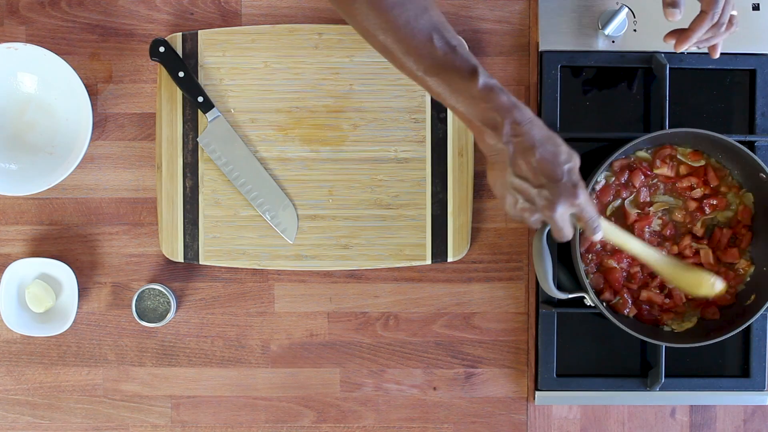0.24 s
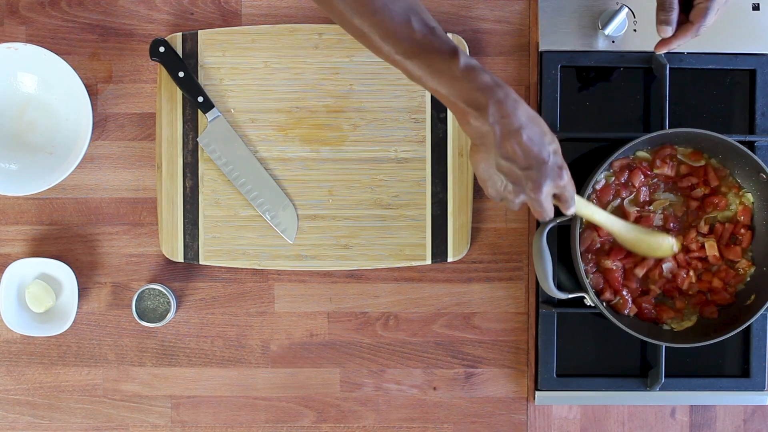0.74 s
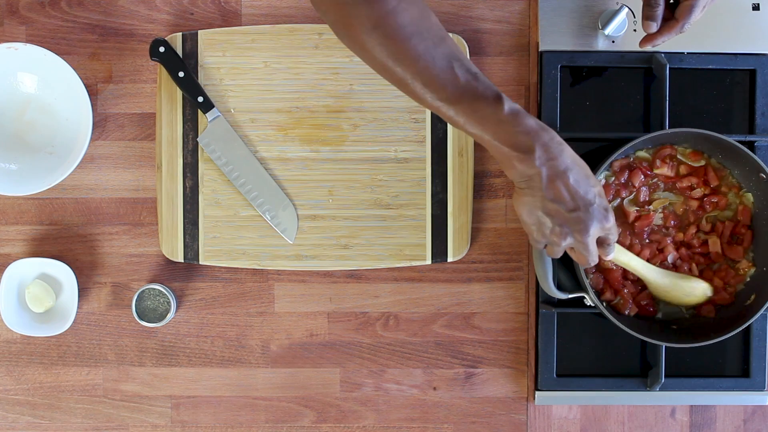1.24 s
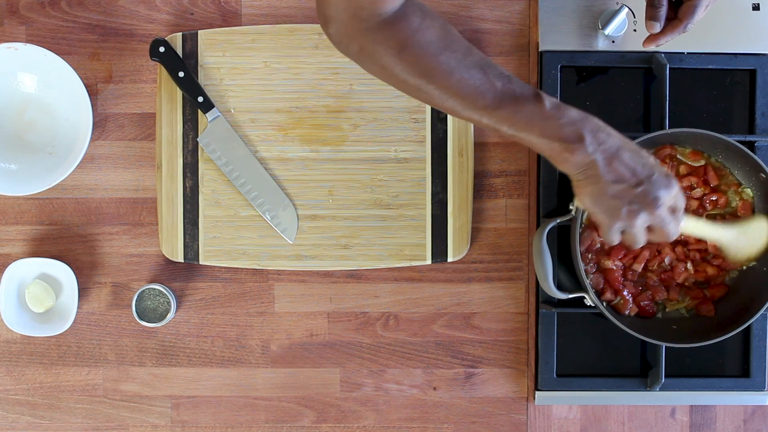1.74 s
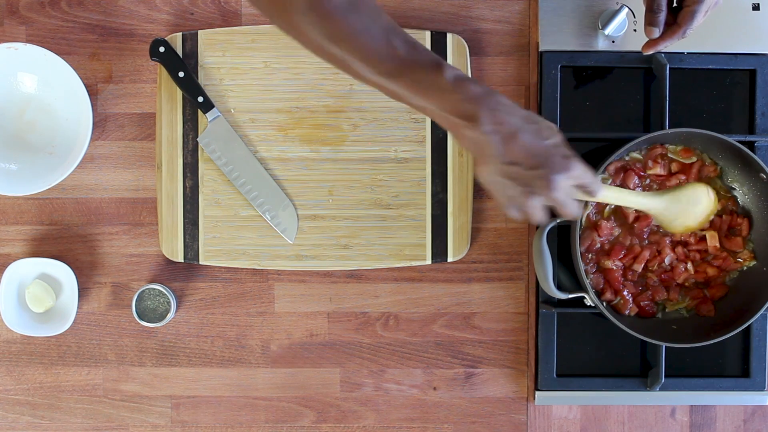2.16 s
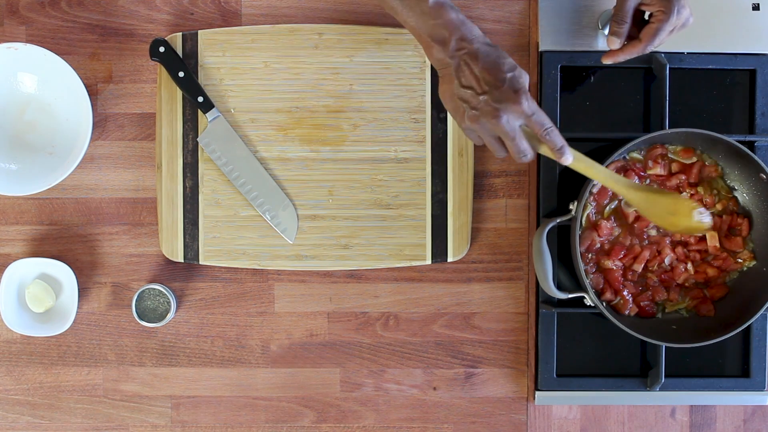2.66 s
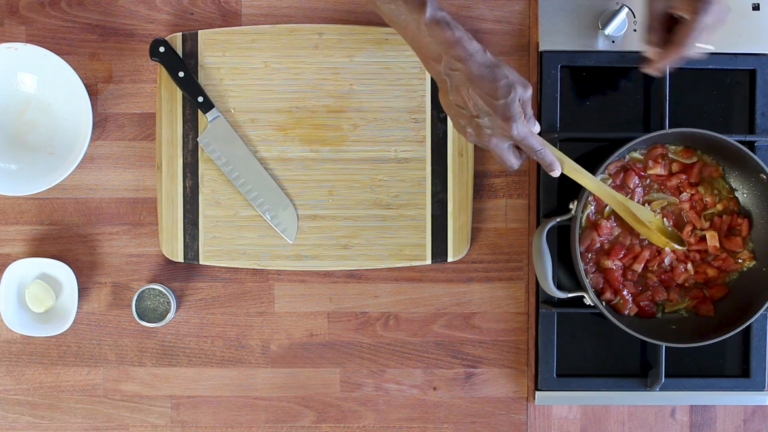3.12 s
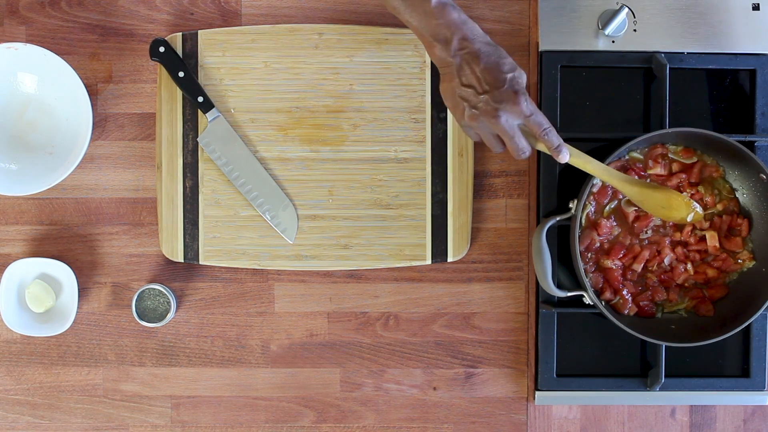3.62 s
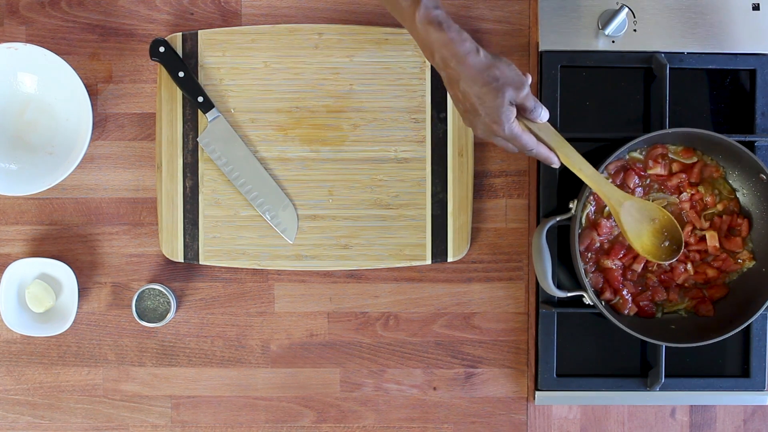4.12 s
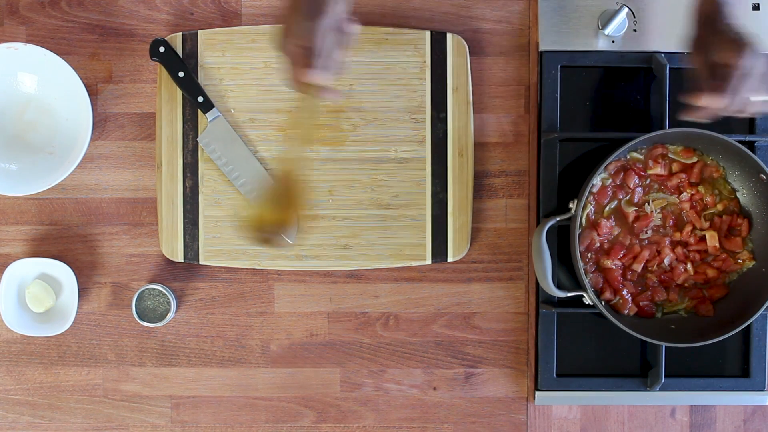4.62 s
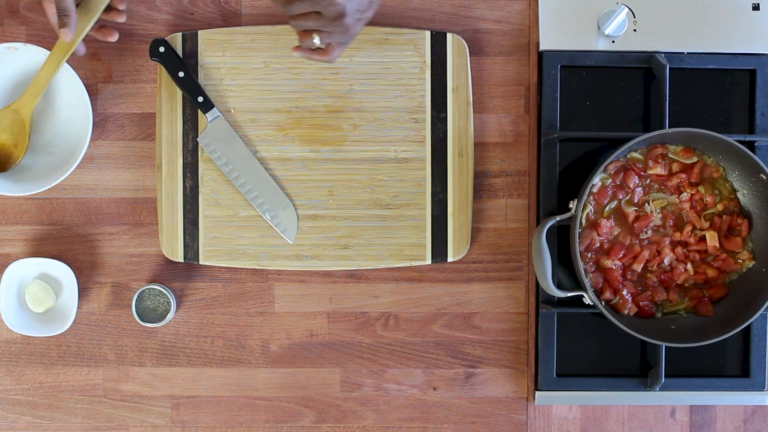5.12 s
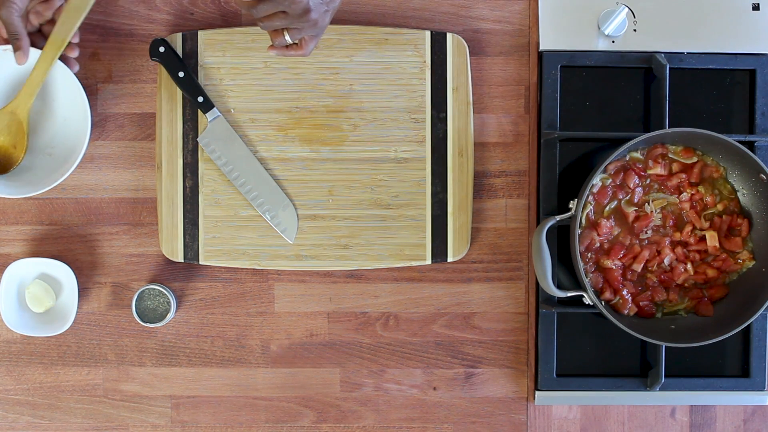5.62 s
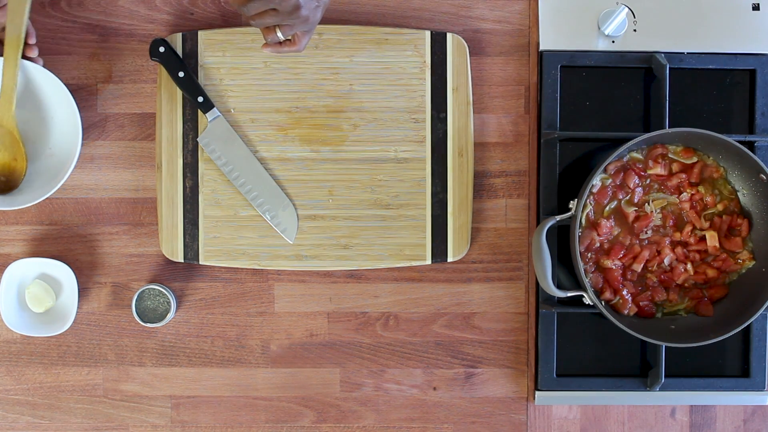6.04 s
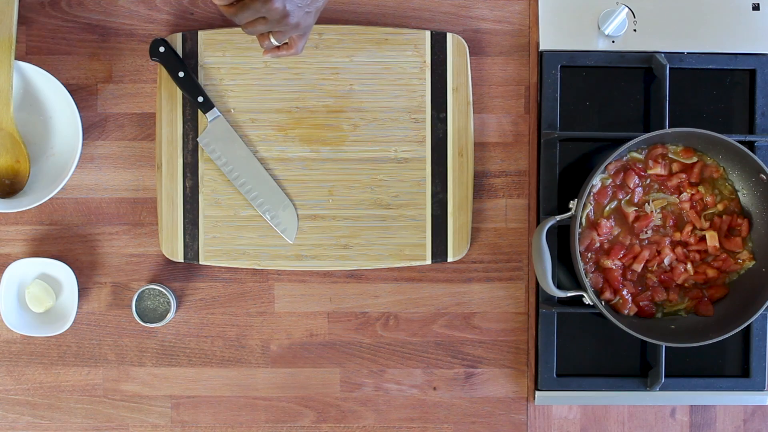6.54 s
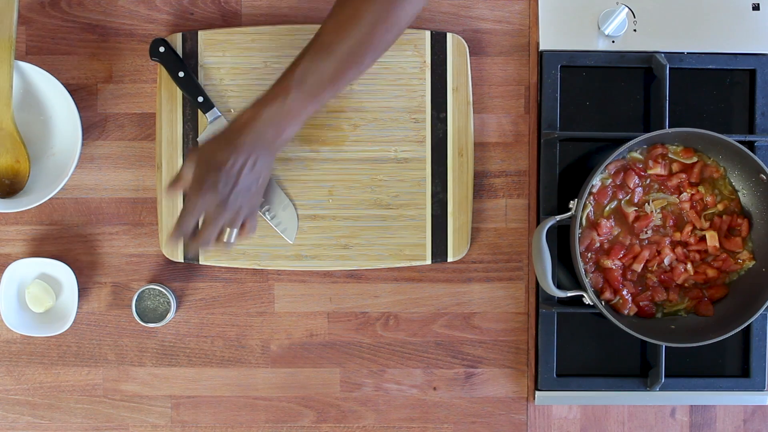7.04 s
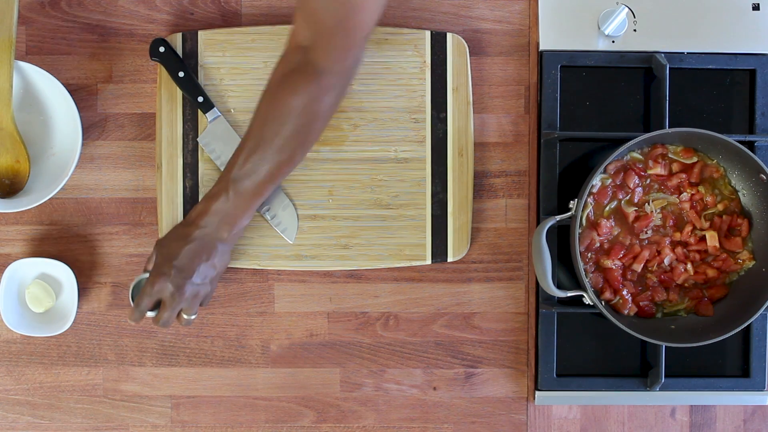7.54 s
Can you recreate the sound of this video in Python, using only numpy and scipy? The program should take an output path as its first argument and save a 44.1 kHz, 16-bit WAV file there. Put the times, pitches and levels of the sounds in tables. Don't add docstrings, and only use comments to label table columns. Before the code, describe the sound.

Faint tomato sizzle with small spits, dull wooden bumps, three hard spoon raps on the pan rim, then a light clack into a bowl.

```python
import sys
import numpy as np
from scipy import signal
from scipy.fft import rfft, irfft
from scipy.io import wavfile
from scipy.ndimage import uniform_filter1d

SR = 44100
rng = np.random.default_rng(int(sys.argv[2]) if len(sys.argv) > 2 else 0)


def how_loud(loudness_db):
    steps = np.asarray(loudness_db, float) / 20
    return 10 ** steps


def output_pcm(signal):
    pcm = np.clip(np.atleast_2d(signal).T, -1, 1) * 32767
    wavfile.write(sys.argv[1], SR, np.round(pcm).astype(np.int16))


N = 342774
T = np.arange(SR) / SR
HALF = SR // 2

# t/s, level/dB
BOIL = [(0, 2.5), (.8, 1.5), (1.05, -1), (1.45, 2), (1.75, 0.5), (2.15, 4), (2.5, 0.5), (3.3, -.5),
        (4.0, 0), (4.7, 0), (5.5, -2.5), (6.1, -1.5), (6.5, -2.5), (7.0, -1.5), (7.3, -8.5), (7.77, -5.5)]
# f/Hz, level/dB
HISS = [(1290, -13), (2200, -9), (2470, -28), (2700, -4), (3330, -5), (5600, -5), (7280, -30),
        (12300, -120)]
SPRAY = [(3300, -10.5), (5600, -5), (7350, -5), (9650, -6), (11500, -9.5), (13000, -14), (14500, -24),
         (15700, -43)]
MURMUR = [(240, -15), (400, -4), (560, -2.5), (800, -4.5), (1020, -9), (1400, -4), (2000, -8.5),
          (2500, -6.5), (3900, -23.5)]
RUMBLE = [(12, -27), (20, 9), (43, -10.5), (70, -1), (114, -1), (151, -0.5), (295, -3), (354, 2),
          (414, -24), (600, -1.5), (780, -33), (1320, -120)]
# f/Hz, width/Hz, level/dB
PAN_RESONANCES = [(726, 130, 4), (1212, 245, 8), (1782, 134, 6.5), (2336, 100, 3), (3350, 55, 8),
                  (3875, 49, 4.5), (4390, 40, 5.5), (5200, 840, -3), (7000, 2100, 1)]
# t/s, peak level/dB, centre f/Hz
SPITS = [(0.119, -40, 7350), (0.412, -37.5, 9970), (0.5476, -57, 2420), (0.575, -42, 9520),
         (0.7103, -40, 9700), (0.78, -43, 2350), (0.8244, -39, 8900), (0.949, -45, 9430),
         (1.0985, -41, 2860), (1.2144, -45, 6090), (1.2418, -38, 7900), (1.3463, -38, 2750),
         (1.3672, -46, 4390), (1.932, -47, 3120), (2.0395, -45, 2280), (2.2287, -45, 6550),
         (2.4192, -41, 8200), (2.578, -42, 6360), (3.5138, -48, 2320), (3.918, -47, 5140),
         (4.37, -50, 8040), (5.404, -43, 3240), (6.2176, -42, 3350)]
# t/s, length/s, peak level/dB, centre f/Hz
SHUFFLES = [(.42, 0.1, -66, 153), (1.252, 0.13, -64.5, 72), (1.791, 0.024, -60, 94),
            (4.25, 0.097, -58, 138), (4.85, 0.15, -61.5, 172), (5.4, 0.13, -61, 113),
            (5.779, 0.15, -60.5, 350), (5.95, 0.23, -62.5, 172), (6.296, 0.026, -68, 70),
            (7.298, 0.088, -60.5, 245), (7.65, 0.14, -67.5, 150)]
# t/s, wood peak level/dB, thump level/dB, click level/dB, pitch ratio
BUMPS = [(1.51, -35, -4.5, -12, 0.9), (1.773, -53, -1, -26, 1.03), (1.82, -55, -19, -25, 1.9),
         (1.843, -36, -7.5, -13, 0.82), (1.854, -31, -13.5, -15, 1.003), (1.864, -33.5, -10, -31, 1.05),
         (2.67, -23, -30, -26, 1.08), (2.719, -37, -25, -28, 1.02), (3.061, -43.5, -2, -35, 1.2),
         (4.202, -36.5, -10.5, -35, 1), (6.072, -48, -25, -22, 1.26)]
KNOCKS = [
    (2.618, -9, -13.5, -6, 1.001),
    (2.813, -9, -10.5, -3.5, 0.98),
]
LAST_KNOCK = [
    (3.6333, -6.5, -11, -3, 1.001),
]
LAYING = [
    (5.012, -19.5, -6, -4.5, 1.054),
    (5.035, -31, -8, -23, 0.9),
    (5.049, -28.5, -3.5, -18, 0.912),
    (5.067, -34.5, -2.5, -31.5, 0.86),
    (5.099, -29.5, -5.5, -22, 0.85),
    (5.124, -34, -9, -27, 0.91),
    (5.155, -44, 3.5, -30, 0.89),
    (5.205, -45, -1.5, -30, 0.99),
]
# f/Hz, level/dB, T60/s
PAN_FLOOR = ([(1130, 12, 0.027), (944, -0.5, 0.076), (1640, 0.5, 0.027)], [(644, 8.5, 0.024),
             (457, -10.5, 0.22), (235, -43, 0.031)], [(2070, 9.1, 0.025), (2610, 6, 0.032),
             (3600, 4, 0.018)])
RIM = ([(1228, 3.5, 0.038), (1763, -2.5, 0.048), (1422, -11, 0.1)], [(475, 3, 0.02), (311, -22, 0.02),
       (646, -9, 0.034)], [(2636, 0.5, 0.026), (3120, -8, 0.033), (4560, -19, 0.062)])
HANDLE = ([(1230, 0, 0.053), (1735, 6.5, 0.034), (1465, -5, 0.03)], [(534, -2, 0.038), (311, -17, 0.02),
          (664, -5, .03)], [(2660, 2, 0.024), (3250, -6, 0.022), (4250, -14, 0.015)])
BOWL = ([(1480, 9.5, 0.013), (1180, 2.5, 0.012), (852, -8, 0.11)], [(537, 7.5, 0.011), (363, -1.5, 0.063),
        (217, -2.5, 0.048)], [(4550, -2, 0.019), (3630, 3, 0.019), (5750, -23, 0.015)])
# t/s, f/Hz, peak level/dB, rise/s, T60/s
PAN_RINGS = [(1.508, 1070, -41, 0.004, 0.65), (2.67, 1180, -15.5, .002, .05), (2.831, 432, -37, .03, .5),
             (3.061, 1015, -31, 0.0033, 0.041), (3.644, 7550, -24, .003, .05),
             (3.6575, 7430, -23.5, .001, .04), (4.2015, 1156, -24, .0015, .022),
             (6.073, 1400, -40, .0015, .02), (6.217, 1870, -40, .001, .015)]
BOWL_RINGS = [(5.011, 7600, -35.5, .002, .18), (5.0115, 1470, -20, .0008, 0.02),
              (5.011, 3740, -46, .0018, 0.49), (5.011, 9787, -49.5, .002, 0.18),
              (5.009, 2540, -45, .003, .25), (5.011, 10800, -51, .001, .08), (5.011, 2180, -49, .004, 0.29),
              (5.021, 5570, -38.5, 0.013, 0.27), (5.03, 899, -35, .03, 0.65),
              (5.024, 2156, -32.5, 0.051, 0.53), (5.024, 2183, -36, 0.048, 0.43)]
# t/s, peak level/dB, centre f/Hz, relative width, T60/s
RATTLE = [(1.6878, -36, 1900, 2.2, 0.013), (2.6257, -15, 7000, 0.6, 0.044),
          (2.6434, -15.5, 8800, 0.15, 0.014), (2.6544, -24, 4320, 0.46, 0.032),
          (2.8201, -12, 6850, 0.38, 0.027), (2.8329, -19.5, 7500, 0.79, 0.025),
          (3.6345, -23, 4330, 0.27, 0.015), (3.6342, -24, 8000, .4, 0.018),
          (3.6408, -18.5, 8840, 0.35, 0.03), (3.6572, -23.5, 8700, 0.23, 0.046),
          (5.0115, -31, 4560, 0.33, 0.0089), (5.0903, -37.5, 5200, 0.14, 0.012),
          (5.0905, -34.5, 3200, 0.17, 0.017), (5.091, -43, 7000, 0.55, 0.006)]
# f/Hz, T60/s
ROOM_T60 = [(60, 1), (160, 0.37), (420, 0.45), (1100, 0.46), (2910, 0.36), (7680, 0.36)]
# f/Hz, level/dB
ROOM_COLOUR = [(30, -1), (70, -7.5), (150, 10), (210, 3), (350, 14.5), (550, 10.5), (750, 9.5), (900, 2),
               (1150, 4.5), (1750, 2.5), (2150, 6), (3200, 11.5), (4600, 6.5), (8000, 1), (16000, 1)]
# f/Hz, level/dB, T60/s
ROOM_MODES = [(69.9, -7, 0.49), (115, -8, 0.29), (179, -26.5, 1), (207.8, -3.5, 0.39), (248, 2.5, 0.097),
              (309.7, -5.5, 0.42), (489.3, -5, 0.15)]


def colour(x, points):
    hz, db = np.transpose(points)
    f = np.maximum(np.fft.rfftfreq(len(x), 1 / SR), 1)
    gain = how_loud(np.interp(np.log(f), np.log(hz), db))
    return irfft(rfft(x) * gain, len(x))


def unit(x):
    return x / np.sqrt(np.mean(x ** 2))


def fade(t60, size=HALF):
    return np.exp(-np.log(1000) * T[:size] / t60)


def add(track, s, x):
    i = int(s * SR)
    track[i:i + len(x)] += x[:N - i]


def walk(rate):
    k = int(SR / rate)
    steps = np.repeat(rng.standard_normal(N // k + 1), k)
    return unit(uniform_filter1d(uniform_filter1d(steps, k), k)[:N])


def burst(hz, width, t60, noise):
    edges = np.clip([hz / (1 + width), hz * (1 + width)], 100, 12500)
    band = signal.butter(3, edges, "bandpass", fs=SR, output="sos")
    x = signal.sosfilt(band, noise * fade(t60, size=len(noise)))
    return x / np.abs(x).max()


def bubbles(rate, flurry, size_db, hold):
    sizes = how_loud(size_db * rng.exponential(size=N).clip(0, 4))
    pops = (rng.random(N) < rate * flurry / SR) * sizes
    return unit(signal.lfilter([1], [1, -hold], pops) * rng.standard_normal(N))


def fizz(flurry):
    per_s, cycles, size_db = 19, 7.8, 5.5
    out = 0
    for hz in 2600 * 2 ** np.arange(0, 2.4, .3):
        sizes = how_loud(size_db * rng.exponential(size=N).clip(0, 3))
        pops = (rng.random(N) < per_s * flurry / SR) * sizes
        pole = np.exp(2j * np.pi * hz / SR - np.log(1000) * hz / (cycles * 2 * SR))
        out = out + unit(signal.lfilter([1], [1, -pole], pops).imag) * np.sqrt(hz)
    return unit(out)


def patchy(x):
    spectrum = rfft(x)
    f = np.maximum(np.fft.rfftfreq(N, 1 / SR), 1000)
    band = np.floor(3 * np.log2(f / 1000))
    return sum(irfft(spectrum * (band == k), N) * how_loud(0.7 * walk(7)) for k in np.unique(band))


def through_pan(x):
    f = np.fft.rfftfreq(N, 1 / SR)
    lift_db = sum(db / (1 + (2 * (f - hz) / width) ** 2) for hz, width, db in PAN_RESONANCES)
    return irfft(rfft(x) * how_loud(lift_db), N)


def sizzle():
    t = np.arange(N) / SR
    from_middle = t - t.mean()
    boil = np.interp(t, *np.transpose(BOIL))
    hiss_db = -59.5 + 0.69 * boil + 0.78 * from_middle
    spray_db = -55 + boil
    murmur_db = -56.5 + 0.15 * boil - 0.37 * from_middle
    noise = rng.standard_normal((4, N))
    swell, flurry = walk(14), how_loud(3.5 * walk(16))
    large = bubbles(120, flurry, 3.9, 0.995)
    small = bubbles(370, flurry, 5.8, 0.86)
    steam = noise[0] + 0.13 * large + 0.052 * small
    hiss = unit(colour(steam, HISS)) * how_loud(hiss_db + 0.21 * swell)
    bursting = noise[1] + 0.42 * large + 0.31 * small + how_loud(-11.5) * fizz(flurry)
    spray = unit(colour(bursting, SPRAY)) * how_loud(spray_db + 0.24 * swell)
    simmer = noise[2] + 0.22 * large
    murmur = unit(colour(simmer, MURMUR)) * how_loud(murmur_db + 0.5 + 0.72 * swell)
    rumble = unit(colour(noise[3], RUMBLE)) * how_loud(-62 - 1.0 + walk(13))
    return through_pan(patchy(hiss + spray) + murmur) * how_loud(-2.5) + rumble


def chatter(rows):
    out = np.zeros(N)
    for (s, db, hz, width, t60), noise in zip(rows, rng.standard_normal((len(rows), 2048))):
        add(out, s, how_loud(db) * burst(hz, width, t60, noise))
    return out


def shuffles():
    out = np.zeros(N)
    for (s, length, db, hz), noise in zip(SHUFFLES, rng.standard_normal((len(SHUFFLES), SR))):
        band = signal.butter(2, [hz / 1.37, hz * 1.3], "bandpass", fs=SR, output="sos")
        low = unit(signal.sosfilt(band, noise))
        swell = how_loud(db) * low * np.exp(-((T - .5) / length) ** 2)
        add(out, max(s - .5, 0), swell[int(max(.5 - s, 0) * SR):])
    return out


def walls():
    out = np.zeros(N)
    for s, hz, db, rise, t60 in PAN_RINGS + BOWL_RINGS:
        envelope = (1 - np.exp(-T / rise)) * fade(min(t60, 1), size=SR)
        add(out, s, how_loud(db) * np.sin(2 * np.pi * hz * T) * envelope)
    return out


def ring(modes, pitch, chance):
    return sum(how_loud(db + 3.5 * c) * np.sin(2 * np.pi * hz * pitch * T[:HALF]) * fade(t60)
               for (hz, db, t60), c in zip(modes, chance))


def strike(rows, body, knock_hz, push_db, room_db, rise_s):
    near, sent, t = np.zeros(N), np.zeros(N), T[:HALF]
    wood, thump, click = body
    contact = 1. * (t == 0)
    for (s, db, thump_db, click_db, pitch), c in zip(rows, rng.standard_normal((len(rows), HALF))):
        blow = ring(wood, pitch, c[:3])
        blow = blow + how_loud(thump_db + 9.5) * ring(thump, pitch, c[3:6])
        blow = blow + how_loud(click_db) * ring(click, pitch, c[6:9])
        blow = blow * (1 - np.exp(-t / rise_s))
        crack = how_loud(click_db + 2.5) * burst(3200, 1.0, 0.026, c)
        push = how_loud(push_db) * np.exp(-((t - .003) / 0.002) ** 2)
        knock = how_loud(11.5) * burst(knock_hz * pitch, 0.34, 1, contact)
        knock = knock + how_loud(thump_db + 14) * burst(396, 1.4, 1, contact)
        add(near, s, how_loud(db - 5.0) * (blow + how_loud(-6.5) * crack + how_loud(-6.5) * knock))
        add(sent, s, how_loud(db - 7.0 + room_db) * (how_loud(-7.5) * blow + knock + crack + push))
    return np.array([near, sent])


def spoon():
    inside = strike(BUMPS, PAN_FLOOR, knock_hz=947, push_db=-8.5, room_db=-2.5, rise_s=0.0015)
    rim = strike(KNOCKS, RIM, knock_hz=1378, push_db=-9, room_db=-0.1, rise_s=0.001)
    last = strike(LAST_KNOCK, HANDLE, knock_hz=1400, push_db=-8.0, room_db=-1.35, rise_s=0.0012)
    laid = strike(LAYING, BOWL, knock_hz=905, push_db=-32, room_db=-1.5, rise_s=0.001)
    return inside + rim + last + laid


def kitchen():
    hz, t60 = np.transpose(ROOM_T60)
    spectrum = rfft(colour(rng.standard_normal(SR), ROOM_COLOUR))
    f, tail = np.arange(HALF + 1), 0
    for centre in 30 * 2 ** np.arange(0, 9.6, .5):
        band = (f >= centre * 2 ** -.25) & (f < centre * 2 ** .25)
        decay = fade(np.interp(np.log(centre), np.log(hz), t60), size=SR)
        tail = tail + irfft(spectrum * band) * decay
    waves = sum(how_loud(db) * np.sin(2 * np.pi * m * T) * fade(d, size=SR) for m, db, d in ROOM_MODES)
    build = 1 - np.exp(-(T / .007) ** 2)
    return how_loud(-34.0) * build * (tail + how_loud(-5.5) * waves)


def scene():
    boiling = sizzle()
    spits = chatter([(*row, 0.21, 0.013) for row in SPITS])
    moves = shuffles()
    near, sent = spoon()
    tones, rattle = walls(), chatter(RATTLE)
    driven = sent + how_loud(-4.5) * rattle + how_loud(-10) * spits + how_loud(-37) * tones
    echo = signal.fftconvolve(driven, kitchen())[:N]
    return (near + rattle + spits + tones + echo + boiling + moves)[None]


def roll_off(x):
    return signal.sosfilt(signal.butter(12, 16450, fs=SR, output="sos"), x)


def record(dry):
    mic = colour(dry[0], [(15, -8), (35, -.1), (15650, .1), (16100, -35)])
    return roll_off(mic[None])


dry = scene()
out = record(dry)
output_pcm(out)
```